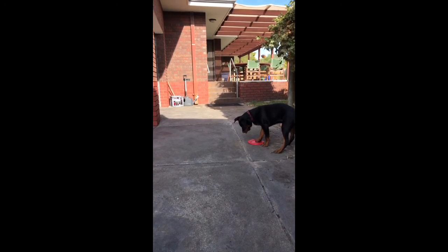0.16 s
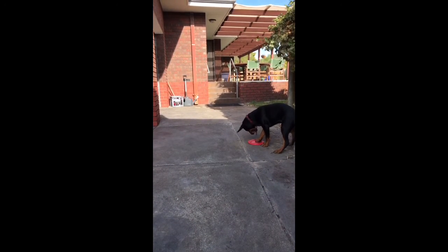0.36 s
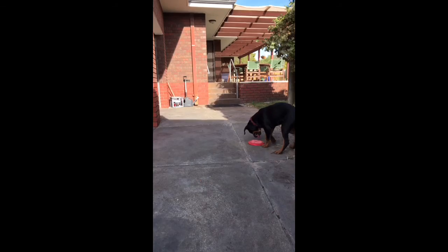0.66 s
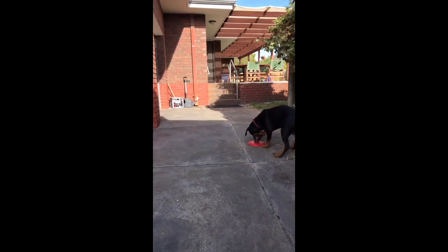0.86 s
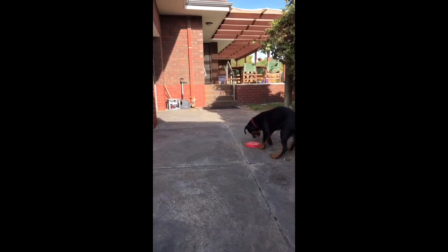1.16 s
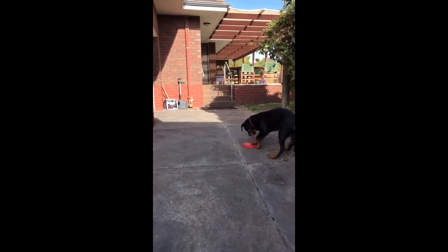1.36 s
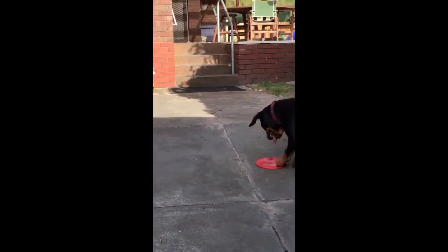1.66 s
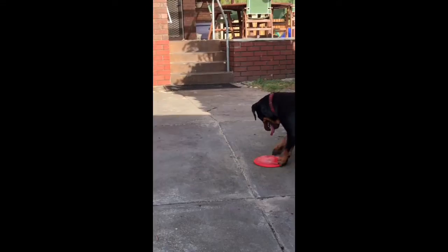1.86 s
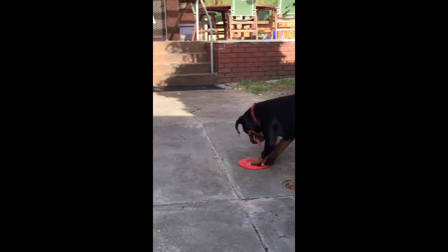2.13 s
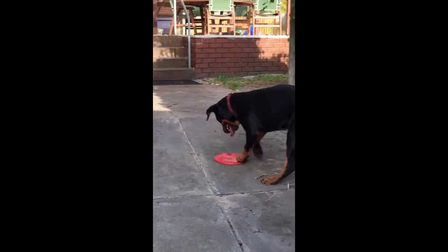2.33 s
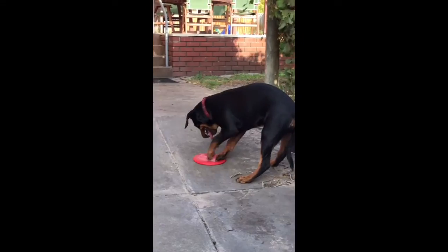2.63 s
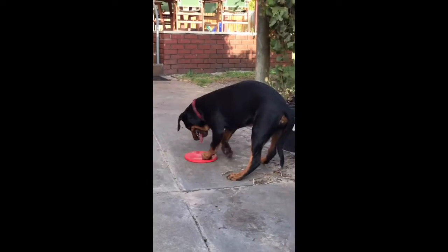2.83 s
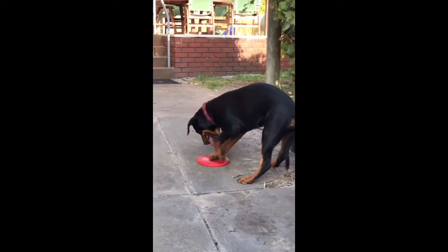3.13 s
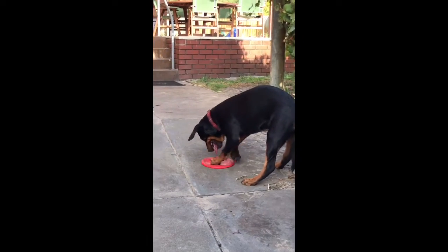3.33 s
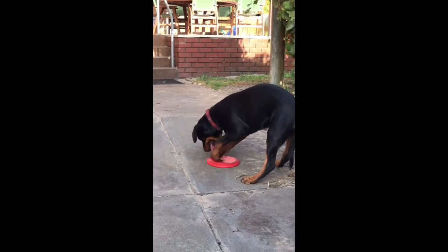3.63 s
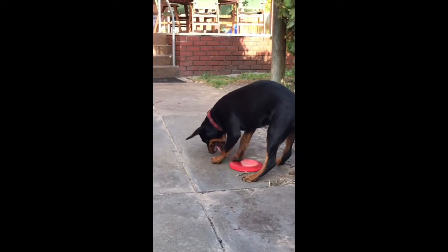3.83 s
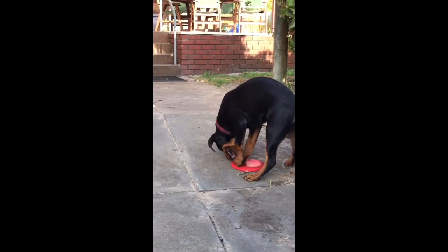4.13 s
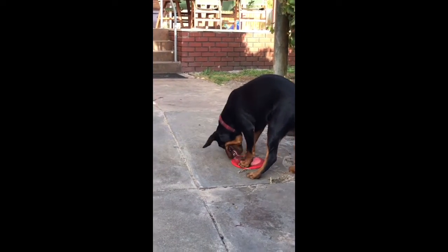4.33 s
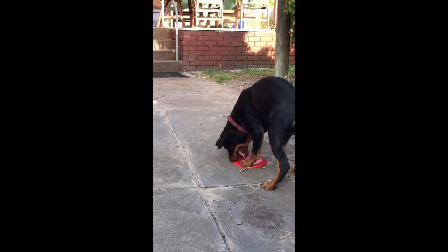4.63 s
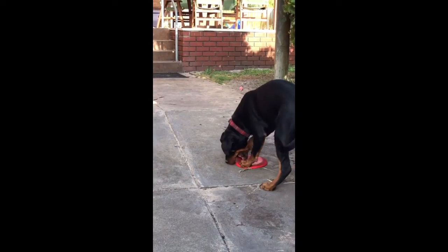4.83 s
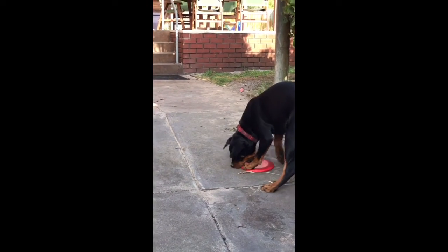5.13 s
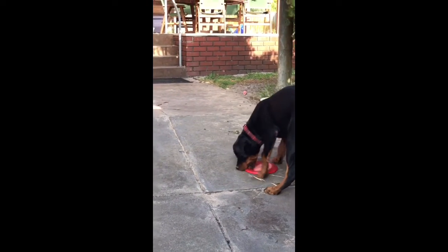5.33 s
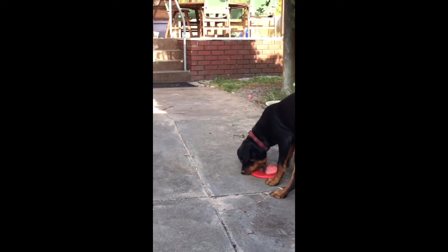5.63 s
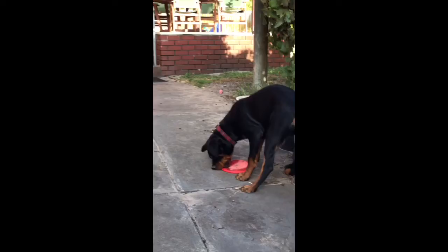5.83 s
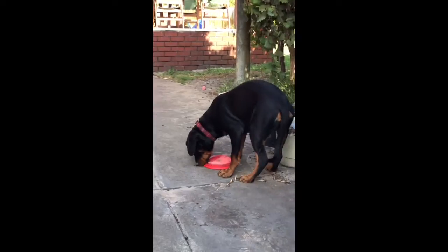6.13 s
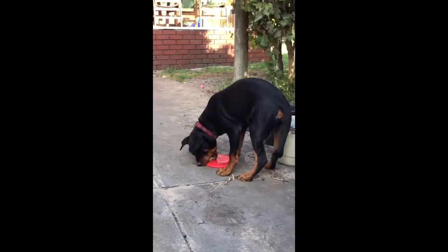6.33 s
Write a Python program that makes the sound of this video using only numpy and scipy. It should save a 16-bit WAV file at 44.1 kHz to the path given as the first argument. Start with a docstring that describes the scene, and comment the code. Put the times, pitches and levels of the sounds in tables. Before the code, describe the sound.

A dog paws a hollow plastic disc over gritty concrete: irregular scrapes, sharp clacks and claw taps, with light wind bumping the microphone.

```python
"""Dog with a plastic disc on a patio

A dog paws the disc about on concrete: the rim drags over the grit, claws and teeth knock it.
The disc's broad modes colour both: grains jolt them in the drag, short contacts strike them in a knock.
Feedback delays give the short reverberation of brick walls and a roof.
Filtered noise and lone thumps are wind at the microphone; a hum swells over a quiet suburban background."""
import sys
import numpy as np
from scipy import signal
from scipy.fft import rfft, irfft
from scipy.io import wavfile
from scipy.ndimage import uniform_filter1d

SR = 44100
rng = np.random.default_rng(int(sys.argv[2]) if len(sys.argv) > 2 else 0)


def digitize_waveform(pressure):
    """Quantize a signal to 16-bit integers and store it at the path in sys.argv[1].

    Rows of a 2-D input are taken as channels; values are limited to [-1, 1].
    """
    field = np.atleast_2d(pressure).T
    bounded = np.clip(field, -1, 1)
    quanta = np.round(bounded * 32767).astype(np.int16)
    wavfile.write(sys.argv[1], SR, quanta)


N = 286341

# All levels are set ahead of the layer trims, the patio and record().
# strokes of the paw: (time of full force [s], time to rise 20 dB [s], at least 0.004, hold [s], low modes [dB],
# high modes [dB above low], grit hiss [dB above low], finest grit [dB above low])
STROKES = [(0.556, 0.1043, 0.074, -37.5, -0.5, -16.5, -24), (0.888, 0, 0.0038, -43.5, -5.5, -12, -23),
           (1.048, 0.12, 0.1, -49, -0.5, -10, -18), (1.327, -0.2652, .005, -35, -1.5, -20.5, -33),
           (1.495, -0.14, 0.072, -41, -3.5, -14, -22), (1.667, 0.04, 0.028, -41, 5, -8.5, -17),
           (1.755, 0.5, .05, -47.5, -3, -20, -22), (1.86, -0.06, 0.045, -33.5, -6, -18.5, -25),
           (1.935, 0.08, 0.022, -33.5, -4.5, -18.5, -25), (2.116, 0.07, 0.027, -41, -1.5, -5.5, -14),
           (2.201, -0.03, .005, -41.5, -1.5, -16, -25), (2.228, -0.8, 0.1, -49.5, 1.5, -9.5, -15),
           (2.434, -0.1, 0.041, -24, -6.5, -16.5, -23), (2.68, 0.25, 0.26, -49.5, 1.5, -7.5, -12),
           (2.935, 0.03, .005, -44, -1, -2.5, -5), (2.969, -0.32, 0.068, -37, -1, -12.5, -18),
           (3.053, .15, .005, -33, -6, -21.5, -27), (3.164, 0, 0.026, -41, 4.5, -7, -7.5),
           (3.235, -1, 0.092, -48.5, 1.5, -11, -19), (3.308, -0.24, 0.026, -38, 4, -15, -22),
           (3.489, 0.04, 0.043, -37, -2.5, -19.5, -28), (3.657, 0.046, 0.18, -27, -2, -10.5, -19.5),
           (3.898, -0.6, .04, -45, -2.5, -3.5, -8), (3.981, -0.16, 0.015, -53.5, 8.5, 4.5, -2),
           (4.22, -0.56, 0.027, -59, 5, 2.3, 1), (4.363, 0.07, 0.0029, -33.5, 3.5, -10.5, -20),
           (4.45, 0.6, 0.072, -57.5, 1, -5.5, -16), (4.685, 0.12, 0.024, -57.5, 3, -3, -3),
           (4.874, 0.04, 0.016, -38, -3.5, -8.5, -12), (4.933, 0.08, 0.048, -31.5, -4, -10.5, -18),
           (5.039, 0.08, 0.027, -31.5, -7, -14.5, -25.5), (5.128, -0.08, .01, -41.5, -9.5, -18, -27),
           (5.364, 0.11, 0.014, -50, -0.5, -3.5, 1), (6.16, -0.03, 0.031, -38.5, -8, -17.5, -24)]
# fall after a stroke: low modes, high modes, grit, finest grit [dB per s]
FADE_DB_PER_S = [227, 248, 236, 250]
# faint shuffling between strokes: (time [s], low modes [dB])
SHUFFLE = [(0, -61), (1.2, -60), (1.5, -58.5), (3.5, -56), (4.0, -56), (4.8, -69), (5.3, -57.5),
           (6.1, -57.5), (6.49, -56.5)]
# the other shuffling layers: high modes, grit, finest grit [dB above low]
SHUFFLE_ABOVE_DB = [-10.5, -14.5, -17.5]
# modes of the disc: (frequency [Hz], width when dragged [Hz], level when dragged [dB])
DISC_MODES = [(532.5, 90, -9), (648.4, 58, -2.5), (748.5, 44, -6), (828.4, 46, -3.5), (978, 256, -2.5),
              (1140, 98, 0.5), (1230, 113, 0.5), (1273.4, 64, 0.5), (1600, 376, -3.5), (1766, 166, -3),
              (2110, 390, -7.5), (2345, 170, -5.5), (2850, 275, -10), (3433, 190, -12.5),
              (3860, 500, -14.5), (4490, 130, -22.5)]
# spectrum of the sand under the rim: (frequency [Hz], relative density [dB per Hz])
GRIT_SPECTRUM = [(2530, 8), (4300, 2), (5070, -2.5), (6680, -1.5), (10300, -10.5), (11100, -3.5),
                 (12400, -2), (14900, 5), (16000, -18.5)]
# knocks on the disc: (time [s], peak [dB], pitch favoured by the struck spot [Hz], claw tick [dB above peak])
KNOCKS = [(0.539, -32, 710, -21), (0.8789, -34, 614, -23), (0.891, -49, 1220, -22), (1.0165, -43, 830, -33),
          (1.074, -34, 1400, -37), (1.3246, -23, 2300, -23.5), (1.3268, -19.5, 614, -41),
          (1.475, -16, 1750, -40), (1.4938, -17, 1540, -33), (1.5448, -29, 1240, -15.5),
          (1.662, -24, 1840, -41), (1.688, -28, 1340, -18), (1.7219, -35, 1240, -29),
          (1.782, -27.5, 1180, -35), (1.8047, -33, 2820, -27), (1.8404, -19.5, 1260, -40),
          (1.8607, -20.5, 1230, -29), (2.107, -22.5, 4650, -13.5), (2.2206, -21.5, 1770, -34),
          (2.34, -37, 1100, -10), (2.391, -27.5, 1180, -29), (2.409, -24.5, 1230, -35),
          (2.4283, -19, 1280, -26), (2.4772, -11, 1140, -21.5), (2.6624, -38.5, 1150, 3.5),
          (2.7245, -30, 1610, -18), (2.766, -35, 1560, -24), (2.8516, -42, 1660, -6),
          (2.9057, -41, 1180, 10.5), (2.9723, -22.5, 1600, -27), (2.994, -19.5, 1130, -30),
          (3.142, -18.5, 1310, -32), (3.1477, -12, 2260, -40), (3.1586, -15, 1830, -40.5),
          (3.161, -13.5, 1550, -40), (3.1654, -26, 1510, -19), (3.168, -26, 1250, -28),
          (3.211, -45, 4400, 0.5), (3.299, -29, 2330, -32), (3.388, -47, 4400, 2), (3.45, -40, 1178, 1.5),
          (3.488, -19.5, 1210, -35), (3.639, -20.5, 674, -30), (4.3007, -46, 1720, -9),
          (4.309, -35, 920, -13), (4.3245, -25, 1610, -16), (4.3387, -34, 1230, -19.5),
          (4.4743, -36.5, 780, -30), (4.673, -43, 1270, -17), (4.9446, -16, 1230, -26),
          (5.4613, -34.5, 3630, -21), (5.663, -43.5, 1140, -4.5), (5.8638, -32, 1230, -28),
          (5.918, -34, 1240, -24), (5.9874, -30.5, 1280, -27), (6.0406, -27.5, 1220, -49),
          (6.1378, -22, 1320, -22), (6.1406, -13.5, 1660, -39)]
# wind on the microphone: (time [s], rumble [dB], flutter [dB above rumble])
WIND = [(0.0, -49, -6.5), (0.42, -54, -6), (0.59, -35, -6), (0.69, -49, -5), (1.28, -37.5, -7.5),
        (1.61, -53.5, -6), (1.7, -29.5, -6), (1.76, -44.5, -13.5), (1.97, -37.5, -3), (2.04, -53, -13),
        (2.17, -43, -7), (3.02, -55, -5), (3.07, -40, -8.5), (3.42, -54.5, -8), (3.47, -42.5, -6.5),
        (3.99, -49.5, -5), (4.08, -40.5, -7), (4.74, -50, -10), (4.84, -34.5, -10.5), (5.3, -39.5, -16),
        (5.4, -42.5, -14.5), (6.49, -46, -9)]
# single strong eddies on the membrane: (time [s], approximate peak [dB], pitch [Hz])
THUMPS = [(0.893, -30.5, 209), (1.389, -30.5, 132), (1.684, -19.5, 138), (2.164, -27.5, 119),
          (4.12, -31, 151), (4.276, -28, 200), (5.294, -21.5, 59.6), (5.712, -33, 62.3),
          (5.949, -30.5, 110)]
# a low hum swells: (time [s], frequency [Hz], level [dB])
HUM = [(5.6, 112.5, -77), (5.9, 113.3, -57), (6.2, 114.5, -48), (6.49, 113, -41.5)]
# spectrum of the quiet surroundings: (frequency [Hz], relative density [dB per Hz])
BACKGROUND_SPECTRUM = [(59, -51), (100, -5.5), (481, -12), (621, -9), (1230, -15.5), (1800, -17),
                       (3120, -27.5), (3700, -26.5), (4980, -37.5), (6560, -38), (10500, -40), (15000, -40),
                       (16000, -44)]

HIGH_MODES_HZ = 1500   # modes from here up form the high layer
DAMPING = 2.1   # the paw on the disc widens the modes of a knock by this factor
TICK_LOW_HZ, TICK_HIGH_HZ = 2480, 16300   # band of the claw tick
PATIO_T60_S, PATIO_CUT_HZ, PATIO_DB = .3, 3500, -12
BACKGROUND_DB = -55
MIC_BASS_CUT_HZ = 38
TOP_CUT_HZ = 16500   # almost nothing is left above


def amp(db):
    """dB to gain."""
    return 10 ** (np.asarray(db) / 20)


def rms_one(x):
    """Scale to rms 1."""
    return x / np.sqrt(np.mean(x ** 2) + 1e-20)


def in_time(rows):
    """Columns of a curve table, one value a sample."""
    s, *columns = np.transpose(rows)
    return [np.interp(np.arange(N) / SR, s, c) for c in columns]


def drift(rate_hz):
    """Slow random wander of rms 1: noise through two equal low-passes."""
    r = np.exp(-2 * np.pi * rate_hz / SR)
    wander = signal.lfilter([1], [1, -2 * r, r * r], rng.standard_normal(N + SR))
    return rms_one(wander[SR:])   # the first second lets the filter settle


def colour(x, spectrum):
    """Give a white signal a spectrum; rms 1."""
    hz, db = np.transpose(spectrum)
    grid = np.maximum(np.arange(N // 2 + 1) * SR / N, 1)
    gain = amp(np.interp(np.log(grid), np.log(hz), db))
    return rms_one(irfft(rfft(x) * gain, N))


def band(x, low_hz, high_hz):
    """Band-pass."""
    return signal.sosfilt(signal.butter(2, [low_hz, high_hz], "band", fs=SR, output="sos"), x)


def ring(x, hz, width_hz):
    """One mode as a damped resonance: a unit click rings at height about 1."""
    r, w = np.exp(-np.pi * width_hz / SR), 2 * np.pi * hz / SR
    return signal.lfilter([0, np.sin(w)], [1, -2 * r * np.cos(w), r * r], x + 1e-18)


def drag():
    """Sand grains under the rim jolt the modes and hiss; the rim judders as it sticks and slips."""
    low_db, high_db, grit_db, fizz_db = stroke_levels()
    evenness = np.clip((-18 - low_db) / 30, .4, 1)   # a heavy drag runs more evenly
    judder = slips(70.0, .012) * evenness
    jolts = grains(4000.0, 3.17)
    low, high = dragged_modes(jolts)
    sand = colour(grains(9000.0, 2.1), GRIT_SPECTRUM)
    grit = rms_one(band(sand, 3970, 10460)) * amp(grit_db - 2.5 + 2.0 * drift(49.0))
    fizz = rms_one(band(sand, 14300, 19500)) * amp(fizz_db - 3.0 + 2.7 * drift(25.0))
    body = low * amp(-5.0) + high * amp(high_db - 3.0)
    return amp(low_db) * (body * amp(3.75 * judder) + (grit + fizz) * amp(3.56 * judder))


def stroke_levels():
    """Strokes rise, hold and fade over the shuffling: low modes in dB, the other three layers in dB above them."""
    t, (shuffle_db,) = np.arange(N) / SR, in_time(SHUFFLE)
    power = amp(2 * (shuffle_db + np.array([0, *SHUFFLE_ABOVE_DB])[:, None]))
    for s, rise_s, hold_s, db, *above_db in STROKES:
        near = slice(max(round((s - .4) * SR), 0), round((s + hold_s + .3) * SR))
        rise = 20 * np.maximum(s - t[near], 0) / max(rise_s, .004)
        fade = np.outer(FADE_DB_PER_S, np.maximum(t[near] - s - hold_s, 0))
        layers_db = db + np.array([0, *above_db])[:, None]
        power[:, near] += amp(2 * (layers_db - rise - fade))
    low_db, *others = 10 * np.log10(power)
    return [low_db] + [o - low_db for o in others]


def slips(per_s, decay_s):
    """The rim lets go suddenly and settles slowly; mean 0, rms 1."""
    starts = rng.exponential(1, N) * (rng.random(N) < per_s / SR)
    settling = signal.lfilter([1], [1, -np.exp(-1 / (decay_s * SR))], starts)
    train = np.log(0.63 + settling)
    return rms_one(train - train.mean())


def grains(per_s, spread_db):
    """Random small impacts of uneven size; rms 1."""
    sizes = amp(spread_db * np.minimum(rng.exponential(1, N), 4)) * rng.choice([-1, 1], N)
    return rms_one(sizes * (rng.random(N) < per_s / SR))


def dragged_modes(jolts):
    """The paw flexes and damps the disc, so each jolted mode comes and goes; low and high layers of rms 1."""
    steps = rng.standard_normal((len(DISC_MODES), N // 256 + 1))
    flex = np.repeat(signal.lfilter([1], [1, -.7], steps), 256, axis=1)
    flex = uniform_filter1d(flex[:, :N] / flex.std(), size=256)   # smooth the steps
    low, high = np.zeros(N), np.zeros(N)
    for k, ((hz, width_hz, db), f) in enumerate(zip(DISC_MODES, flex)):
        layer = low if hz < HIGH_MODES_HZ else high
        # neighbouring modes alternate in sign
        layer += amp(db + 2.3 * f) * np.sqrt(width_hz) * ring(jolts, hz, width_hz) * (-1) ** k
    return rms_one(low), rms_one(high)


def knocks():
    """Each knock is a hard click and a short rattle into the modes near the struck spot, with a claw tick."""
    out, t = np.zeros(N + SR // 10), np.arange(SR // 10) / SR
    chatter = rng.standard_normal((len(KNOCKS), 2, len(t)))
    for (s, peak_db, spot_hz, tick_db), (push, tick) in zip(KNOCKS, chatter):
        rattle = push * (amp(-15) * np.exp(-t / .002) + amp(-34) * np.exp(-t / .025))
        contact = (t == 0) + rattle
        body = np.zeros(len(t))
        for hz, width_hz, _ in DISC_MODES:
            octaves = np.log2(hz / spot_hz)
            nearness = amp(-40 * octaves ** 2) + amp(-3 - 20 * octaves ** 2)
            body += nearness * ring(contact, hz, width_hz * DAMPING)
        body = band(body, spot_hz * 0.54, spot_hz * 3.7)   # a small spot radiates no bass
        snap = band(tick * np.exp(-t / 0.0017), TICK_LOW_HZ, TICK_HIGH_HZ)
        knock = body / np.abs(body).max() + amp(tick_db + 9.5) * snap / np.abs(snap).max()
        at = round(s * SR)
        out[at:at + len(t)] += amp(peak_db - 3.5) * knock
    return out[:N]


def patio(x):
    """Walls and roof send the sound back: eight feedback delays, duller on every round."""
    out, dull = np.zeros(N), np.exp(-2 * np.pi * PATIO_CUT_HZ / SR)
    for k, lag in enumerate((rng.uniform(.015, .05, 8) * SR).astype(int)):
        loop, gain, state = x.copy(), amp(-60 * lag / SR / PATIO_T60_S), [0.]
        for i in range(lag, N, lag):
            back, state = signal.lfilter([gain * (1 - dull)], [1, -dull], loop[i - lag:i], zi=state)
            loop[i:i + lag] += back[:N - i]
        out += (loop - x) * (-1) ** k   # reflections only
    return out


def wind():
    """Eddies push the membrane in lumps: a rumble and a faster flutter that come together, and lone thumps."""
    rumble_db, flutter_db = in_time(WIND)
    lumps = drift(33.0) + 0.65 * drift(13.0)
    rumble = rms_one(band(band(rng.standard_normal(N), 32.0, 81), 43.7, 214))
    soft_noise = signal.lfilter([1], [1, -.985], rng.standard_normal(N))
    flutter = rms_one(band(soft_noise, 92.6, 445))
    buffeting = rumble * amp(3.25 * lumps) + flutter * amp(flutter_db + 4.57 * lumps)
    return amp(rumble_db - 2.5) * buffeting + thumps()


def thumps():
    """A strong eddy swings the membrane: a sine that swells and dies within a few turns."""
    out = np.zeros(N)
    for s, peak_db, hz in THUMPS:
        turns = np.maximum(np.arange(N) / SR - s, 0) * hz
        swell = np.e * turns / 0.24 * np.exp(-turns / 0.31)
        out += amp(peak_db) * swell * np.sin(2 * np.pi * turns)
    return out


def hum():
    """A faint low tone with its octave."""
    hz, db = in_time(HUM)
    phase = 2 * np.pi * np.cumsum(hz) / SR
    return amp(db) * (np.sin(phase) + 0.22 * np.sin(2 * phase))


def background():
    """Quiet suburban surroundings: coloured noise whose level wanders a little."""
    level_db = BACKGROUND_DB - 0.5 + 1.1 * drift(9.9)
    return amp(level_db) * colour(rng.standard_normal(N), BACKGROUND_SPECTRUM)


def scene():
    """Disc in the patio, wind, hum and background, on one channel."""
    disc = drag() + knocks()
    around = background()
    return (disc + amp(PATIO_DB) * patio(disc) + wind() + hum() + around)[None]


def record(dry):
    """The deepest bass is lost at the microphone, peaks are rounded; almost nothing is kept above about 16 kHz."""
    bass_cut = signal.butter(2, MIC_BASS_CUT_HZ, "high", fs=SR, output="sos")
    top_cut = signal.cheby2(14, 60, TOP_CUT_HZ, fs=SR, output="sos")
    rounded = 0.34 * np.tanh(signal.sosfilt(bass_cut, dry) / 0.26)
    return signal.sosfilt(top_cut, rounded)


dry = scene()
out = record(dry)
digitize_waveform(out)
```